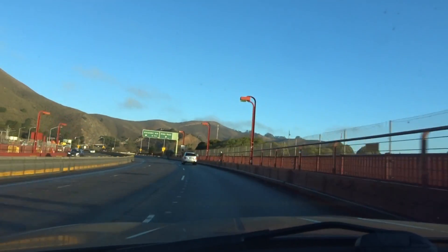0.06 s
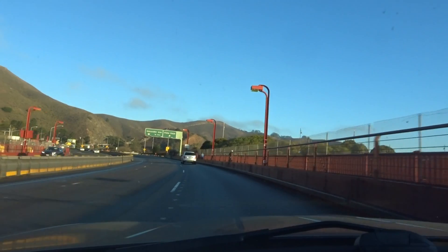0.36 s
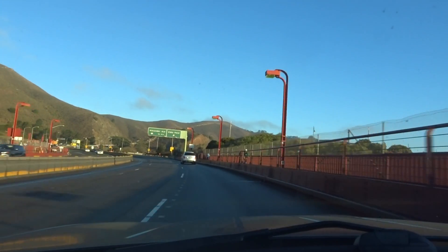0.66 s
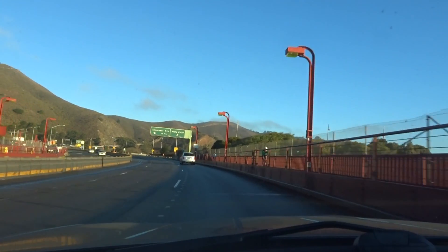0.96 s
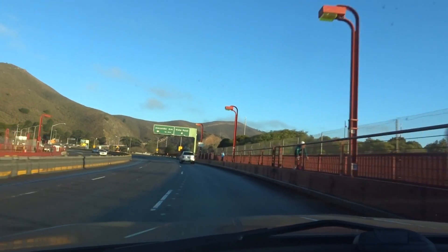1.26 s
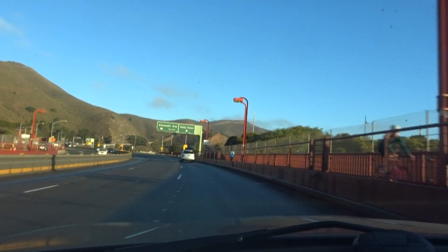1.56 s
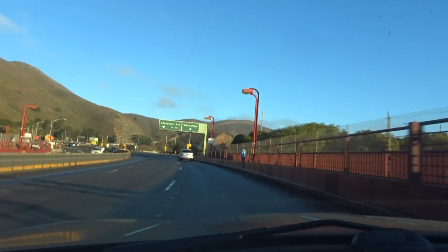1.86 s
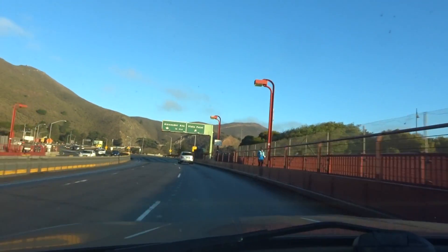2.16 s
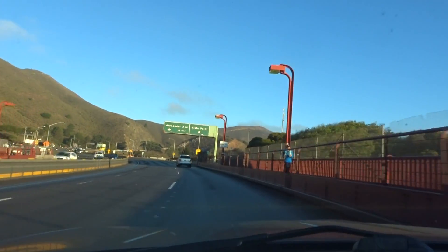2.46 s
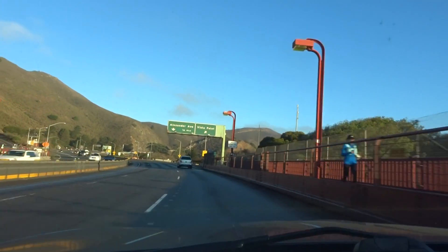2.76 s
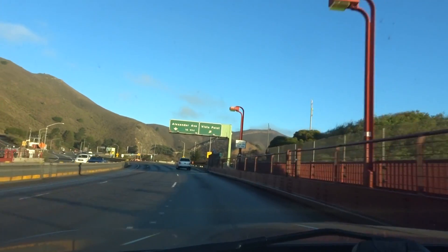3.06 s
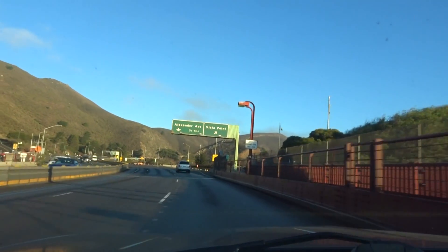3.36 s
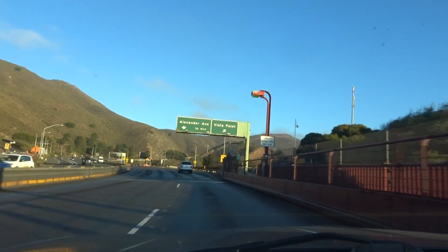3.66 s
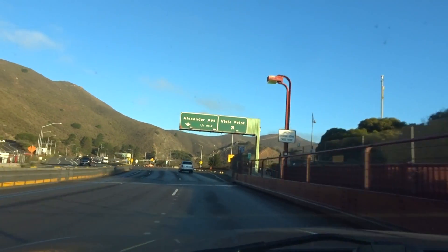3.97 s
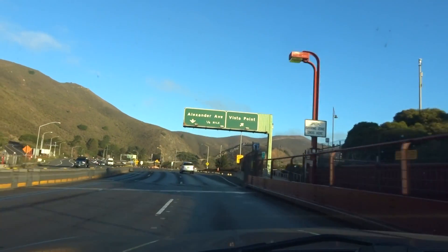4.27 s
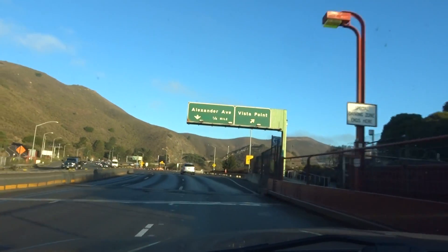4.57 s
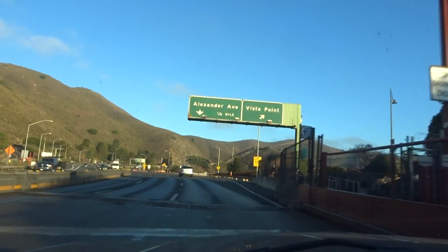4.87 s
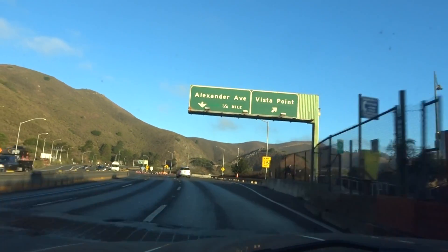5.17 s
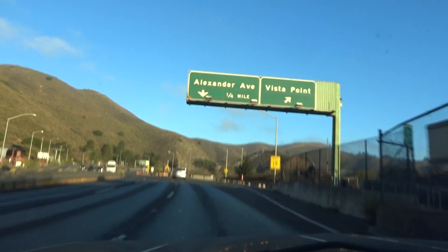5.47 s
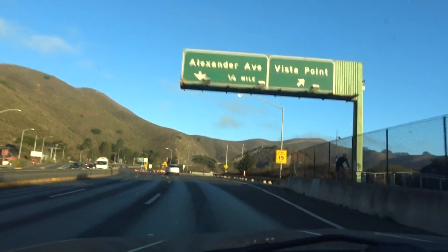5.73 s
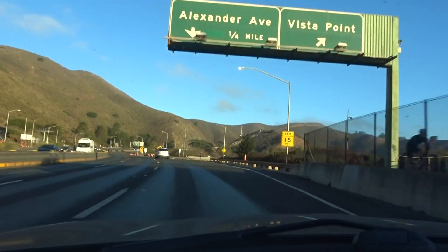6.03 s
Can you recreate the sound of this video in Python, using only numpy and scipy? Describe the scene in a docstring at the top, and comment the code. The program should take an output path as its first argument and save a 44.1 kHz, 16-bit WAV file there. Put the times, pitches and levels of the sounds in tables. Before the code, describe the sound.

Inside a car crossing a bridge at steady speed, the tyres make a constant low rumble and drone. Road joints give paired slaps and dull thumps about once a second, while loose plastic trim ticks faintly on the right. Near the end the trim rattles more, the tyres drum over steel plates with a deep thud, and the road turns quieter. The stereo microphone sits behind the windscreen.

```python
"""Inside a car crossing a bridge at a steady speed, a stereo microphone behind the windscreen.
The rough deck drives the cabin's resonances through the tyres; off to the right, loose trim ticks
and rattles. Each deck joint slaps the front tyres, then the rear ones, and thumps the body.
After a big expansion joint the car rolls onto smoother, quieter asphalt."""
import sys
import numpy as np
from scipy import signal
from scipy.fft import rfft, irfft
from scipy.io import wavfile
from scipy.ndimage import uniform_filter1d, minimum_filter1d

SR = 44100
rng = np.random.default_rng(int(sys.argv[2]) if len(sys.argv) > 2 else 0)


def store_pcm(level_fs):
    """Save levels as 16-bit WAV."""
    pcm = np.round(np.clip(level_fs, -1, 1) * 32767).astype(np.int16)
    wavfile.write(sys.argv[1], SR, np.atleast_2d(pcm).T)


N = 273420
DECK_END_S = 5.79
AXLE_LAG_S = .127  # rear tyres after front tyres

def amp(db):
    """Decibels to gain."""
    return 10 ** (np.asarray(db) / 20)

def unit_rms(x):
    """Scales to an rms of 1."""
    return x / np.sqrt(np.mean(x ** 2) + 1e-20)

def curve(points, hz):
    """A table joined by straight lines over log frequency."""
    points_hz, values = np.transpose(points)
    return np.interp(np.log(hz + 1), np.log(points_hz + 1), values)

def bins():
    """The frequencies of a whole-length spectrum."""
    return np.fft.rfftfreq(N, 1 / SR)

def steadied(x, window_s):
    """Takes the slow chance swells out of a noise and leaves its fast grain."""
    power = uniform_filter1d((x ** 2).mean(0), int(window_s * SR))
    return x / np.sqrt(uniform_filter1d(power, int(window_s * SR / 2)) + 1e-12)

def strike(t, rise_s, decay_s):
    """Envelope of a blow: quick rise, exponential fall."""
    shape = (1 - np.exp(-t / rise_s)) * np.exp(-t / decay_s)
    return shape / shape.max()

def arch(start_s, length_s):
    """An envelope that swells and falls once."""
    return np.sin(np.pi * np.clip((np.arange(N) / SR - start_s) / length_s, 0, 1))

# Resonances around the microphone, of body, cabin air, tyre cavity and tread: pitch_hz, width_hz, lift_db
RESONANCES = [(30.8, 7.6, 12), (127, 10, 6.5), (187.7, 28, 5.5), (222.9, 19.5, 12), (272, 40, 7),
              (370, 31, 5.0), (425.2, 42, 6.5), (637, 5.3, 5), (800.6, 12, 6.5), (1000, 47, 9),
              (1059, 20, 10), (1130, 52, 3.5), (1173, 39, 6), (1330, 28, 3), (1507, 25, 4), (2020, 26, 2),
              (2600, 22, 1.5), (4820, 625, 6), (7000, 410, 3)]
def resonance_db(hz):
    """How far the cabin's resonances raise each frequency."""
    return sum(db / (1 + (2 * (hz - pitch) / width) ** 2) for pitch, width, db in RESONANCES)

# How alike the microphone's two ports hear the cabin off resonance: frequency_hz, coherence
PORT_COHERENCE = [(30, .995), (150, .97), (350, .8), (550, .87), (850, .65), (1500, .48), (1900, .7),
                  (2650, .62), (3100, .15), (7000, .3), (15000, .2)]
# Phase between the ports: frequency_hz, left_lead_rad
PORT_LEAD = [(30, -0.55), (60, 0.8), (110, 0.51), (230, 0.8345), (900, 0.58), (1900, 0), (2350, 2.1),
             (3200, -4.5), (4500, 3.5), (7000, -2.5)]
# Balance between the ports: frequency_hz, left_minus_right_db
PORT_BALANCE = [(80, 0), (280, -0.5), (365, 2), (490, -1.5), (570, -3), (770, 0.5), (950, -1.3), (1100, -1),
                (1700, -3), (2400, -1.5), (6000, -3), (14000, -2)]
def noise_at_mic(spectrum):
    """Noise at both ports; resonances reach them more alike than the diffuse rest."""
    hz = bins()
    left, diffuse = np.exp(2j * np.pi * rng.random((2, len(hz))))
    coherence = np.clip(1 - (1 - curve(PORT_COHERENCE, hz)) / amp(resonance_db(hz)), 0, 1)
    right = coherence * left + np.sqrt(1 - coherence ** 2) * diffuse
    right *= np.exp(-1j * curve(PORT_LEAD, hz))
    lean = amp(curve(PORT_BALANCE, hz) / 2)
    return unit_rms(irfft(np.array([left * lean, right / lean]) * spectrum, N))

def tone_at_mic(hz, t):
    """A sine of random phase as it reaches the two ports."""
    lag_rad = np.array([[0], [curve(PORT_LEAD, hz)]])
    return np.cos(2 * np.pi * (hz * t + rng.random()) - lag_rad)

# Rolling on the bridge, heard from inside: frequency_hz, density_db
DECK_SPECTRUM = [(12, -26), (28, -12.5), (70, -7.5), (150, -9), (260, -14.5), (520, -20.5), (900, -28),
                 (1250, -32), (1700, -40), (2800, -45), (3500, -51), (4100, -60.5), (6000, -72.5),
                 (15500, -84.5)]
# The surface under the tyres; the sound follows part of each column's swing about its mean:
# time_s, long_waves_db, unevenness_db, grain_db
DECK_SURFACE = [(0.0, -21.5, -21.5, -29), (0.48, -22.5, -20, -28.5), (0.8, -21.5, -19, -30.5),
                (1.2, -25, -18.5, -30.5), (1.73, -21.5, -19.5, -30.5), (2.03, -26.5, -22.5, -29),
                (2.32, -26.5, -17, -29), (2.59, -20, -22.5, -31), (2.95, -27, -20, -29),
                (3.37, -17.5, -19.5, -29.5), (3.67, -25, -19.5, -28.5), (4.06, -23.5, -20, -29.5),
                (4.39, -22, -17, -27.5), (4.62, -20.5, -21.5, -31.5), (5.14, -25, -21, -30),
                (5.4, -19, -19.5, -31)]
def deck_roll():
    """The deck shakes the body, drones in the cabin and roars in the treads; air hisses past the glass."""
    t, hz = np.arange(N) / SR, bins()
    colour = amp(curve(DECK_SPECTRUM, hz) + resonance_db(hz)) * hz ** 2 / (hz ** 2 + 8 ** 2)
    low, mid, high = (1 / (1 + (hz / cutoff_hz) ** 10) for cutoff_hz in (160, 560, 1600))
    times, *levels = np.transpose(DECK_SURFACE)
    waves, unevenness, grain = (np.interp(t, times, db - db.mean()) for db in levels)

    def band(power_share, steady_s):
        """One steady part of the rolling noise."""
        return steadied(noise_at_mic(colour * np.sqrt(abs(power_share))), steady_s)

    rumble = amp(-20.5 + .76 * waves) * band(low, .16)
    drone = amp(-18 + .7 * unevenness) * band(mid - low, .14)
    tread = amp(-28 + .64 * grain) * band(high - mid, .28)
    wind = amp(-42.5 + .4 * grain) * band(1 - high, .21)
    return rumble + drone + tread + wind

# The duller roll past the bridge, from the same seat: frequency_hz, density_db
ASPHALT_SPECTRUM = [(15, -12.5), (29, -7), (50, -8.5), (150, -13), (260, -14), (420, -19.5), (620, -23),
                    (950, -25), (1280, -33.5), (1760, -41.5), (2700, -46), (4000, -62), (6000, -75),
                    (15500, -82)]
def road(crossfade_s=.067, asphalt_db=-23.5, resonance_share=.37):
    """The rough deck gives way to asphalt, which barely wakes the resonances."""
    hz = bins()
    colour = amp(curve(ASPHALT_SPECTRUM, hz) + resonance_share * resonance_db(hz))
    asphalt = amp(asphalt_db) * steadied(noise_at_mic(colour), .74)
    on_asphalt = np.clip(.5 + (np.arange(N) / SR - DECK_END_S) / crossfade_s, 0, 1)
    return np.sqrt(1 - on_asphalt) * deck_roll() + np.sqrt(on_asphalt) * asphalt

# Spells of shaking in the trim, right of the microphone: start_s, length_s, level_db
CHATTER_SPELLS = [(4.04, 0.55, -69), (4.091, .035, -51), (4.372, .075, -58), (5.16, 0.42, -65.5),
                  (5.535, 0.25, -50.5), (5.78, 0.11, -72)]
def trim_chatter(contacts_per_s=9000, spread_db=2.5, clump_db=2.5,
                 rise_s=.023, fall_s=.016, settle_s=.07, settle_db=-13.5):
    """Tiny contacts of the shaken trim clump into a rustle; the last loose parts settle slowly."""
    t, shaking = np.arange(N) / SR, np.zeros(N)
    for start_s, length_s, db in CHATTER_SPELLS:
        after_s = np.maximum(t - start_s - length_s, 0)
        release = np.exp(-after_s / fall_s) + amp(settle_db) * np.exp(-after_s / settle_s)
        shaking += amp(db) * np.clip((t - start_s) / rise_s, 0, 1) * release
    contacts = amp(spread_db * np.minimum(rng.exponential(1, (2, N)), 4))
    contacts *= rng.random((2, N)) < contacts_per_s / SR
    contacts *= amp(clump_db * unit_rms(uniform_filter1d(rng.standard_normal(N), size=260)))
    contacts *= rng.standard_normal((2, N))
    colour = amp(curve([(1000, -21), (3200, 7), (8000, -7), (12000, -10.5), (15500, -10)], bins()))
    return shaking * unit_rms(irfft(rfft(contacts) * colour, N))

def faint_knocks(count=8, level_db=-56.5, pitch_hz=4200, length_s=.005):
    """Light knocks at random moments on the deck, each a little different in level and pitch."""
    return [(when * DECK_END_S, level_db + 4 * (force - .5), pitch_hz * 2 ** (pitch - .5), length_s)
            for when, force, pitch in rng.random((count, 3))]

# The ring of the plastic trim: frequency_hz, density_db
TRIM_SPECTRUM = [(600, -8), (2000, 16.5), (3200, 8.5), (4500, 3.5), (6000, -5.5), (7800, -5.5), (9200, -10),
                 (10500, -6.5), (12500, -8.5), (15500, -5)]
# Loose trim knocking, right of the microphone: start_s, level_db, pitch_hz, length_s
TRIM_KNOCKS = [(.63, -54, 6000, .004), (.756, -53, 5500, .005), (1.088, -45, 3440, .005),
               (1.165, -51, 4500, .004), (1.574, -48.5, 3800, 0.021), (1.689, -48, 4500, .005),
               (4.072, -40.5, 5600, .003), (4.084, -40, 6400, 0.0053), (4.302, -49.5, 7000, 0.0035),
               (4.432, -43, 8200, 0.0063), (4.470, -43, 5500, .004), (4.749, -46, 4600, .01),
               (4.805, -45, 4180, 0.011), (4.85, -34.5, 6000, 0.0072), (4.864, -48, 6700, 0.012),
               (5.198, -47.5, 6000, .01), (5.407, -36, 4500, 0.012), (5.468, -39, 2800, 0.0076),
               (5.497, -33, 5000, .002), (5.505, -44, 7500, 0.0017), (5.512, -37, 11000, .003),
               (5.532, -35, 10000, 0.0034), (5.551, -30, 3980, 0.0019), (5.605, -35, 9000, 0.0044),
               (5.636, -38.5, 6000, .008), (5.706, -43, 2600, .009), (5.721, -36, 9000, .0025),
               (5.749, -35.5, 2600, 0.014)]
def trim_ticks(rise_s=.0013, tail_s=.015, tail_db=-16, grit_db=3.5, focus_db=7, uneven_db=2.5):
    """Plastic parts buzz together for milliseconds, each around its own pitch; the cabin adds a tail."""
    size, out = 8192, np.zeros((2, N))
    t, hz = np.arange(size) / SR, np.fft.rfftfreq(size, 1 / SR)
    for start_s, db, pitch_hz, length_s in list(TRIM_KNOCKS) + faint_knocks():
        grit = unit_rms(amp(grit_db * np.repeat(rng.standard_normal(size // 32), 32)))
        fall = np.exp(-.5 * (t / length_s) ** 2) + amp(tail_db) * np.exp(-t / tail_s)
        envelope = (1 - np.exp(-t / rise_s)) * fall
        # every contact point favours other resonances of the panel
        contact_db = uneven_db * unit_rms(uniform_filter1d(rng.standard_normal(len(hz)), size=120))
        off_pitch_db = focus_db * np.log2((hz + 1) / pitch_hz) ** 2
        colour = amp(curve(TRIM_SPECTRUM, hz) + contact_db - off_pitch_db)
        burst = unit_rms(irfft(rfft(rng.standard_normal((2, size))) * colour)) * envelope * grit
        slot = out[:, int(start_s * SR):][:, :size]
        slot += amp(db) * burst[:, :slot.shape[1]]
    return out

def from_right(x):
    """The trim lies to the right, so the left port is shaded, more so in the treble."""
    lean = amp(curve([(2000, -.5), (5000, -2), (9000, -4.4), (14000, -5.4)], bins()) / 2)
    return irfft(rfft(x) * np.array([lean, 1 / lean]), N)

# Each axle on the expansion joint's steel plates, under the floor: start_s, length_s, level_db
PLATE_CROSSINGS = [(5.455, 0.093, -20), (5.58, 0.092, -19.5)]
# The plates' hollow roar: frequency_hz, density_db
PLATE_SPECTRUM = [(100, -18), (290, 0), (420, -1), (600, -3), (850, -16), (1500, -38), (5000, -68)]
# The deep rumble of the body around the microphone: frequency_hz, density_db
HEAVE_SPECTRUM = [(10, -18), (26, -1), (60, -5), (120, -10), (300, -15.5), (700, -47), (3000, -90)]
def expansion_joint(heave_db=-13.5):
    """The tyres drum across steel plates, axle by axle, above one long heave of the body."""
    roar = steadied(noise_at_mic(amp(curve(PLATE_SPECTRUM, bins()))), .055)
    heave = steadied(noise_at_mic(amp(curve(HEAVE_SPECTRUM, bins()))), .055)
    crossings = sum(amp(db) * arch(start_s, length_s) for start_s, length_s, db in PLATE_CROSSINGS)
    return roar * crossings + heave * amp(heave_db) * arch(start_s=5.52, length_s=.32)

# The ring of a struck tyre, heard from inside: pitch_hz, level_db
TYRE_MODES = [(420, -9), (800, -3), (910, -7), (1020, 0), (1130, -12), (1480, -20), (2050, -23),
              (2650, -28)]
# Chips and stray edges catching one tyre: start_s, slap_db, scuff_over_ring_db
ROAD_CHIPS = [(.034, -26.5, -11), (.455, -34, -7), (5.751, -38.5, 14)]
# Deck joints meeting the front tyres; the last four columns drive the body's thumps:
# start_s, slap_db, scuff_over_ring_db, rear_over_front_db, boom_db, boom_hz, boom_swell_s, bounce_db
DECK_JOINTS = [(.768, -32.5, 0.5, 1, -6, 209, 0.035, -13.5),
               (1.553, -23.5, -8, -0.5, -19, 108.5, 0.028, -8.5),
               (2.357, -26.5, 3.5, -3, -5.5, 100, 0.017, -14),
               (3.162, -25, -10.5, 7.5, -8, 127.6, 0.026, -21), (4.416, -31.5, -11, 6, -7, 103, 0.021, -12),
               (5.459, -31.5, 6, -4, -8, 194.3, 0.027, -13), (5.581, -37, 11.5, 5, -17.5, 91.2, 0.073, -13)]
def tyre_slaps(rise_s=.0022, decay_s=.01):
    """A joint strikes the front tyres, then the rear; they ring briefly, and sharp edges add a scuff."""
    t, out = np.arange(N) / SR, np.zeros((2, N))
    scuff_hz_db = [(100, -17), (300, 3), (900, 8), (1600, -7), (2900, -14), (5000, -34.5), (10000, -61.5)]
    scuff = noise_at_mic(amp(curve(scuff_hz_db, bins())))
    front = [(s, db, scuff_db) for s, db, scuff_db, *_ in DECK_JOINTS]
    rear = [(s + AXLE_LAG_S, db + rear_db, scuff_db) for s, db, scuff_db, rear_db, *_ in DECK_JOINTS]
    for start_s, db, scuff_db in front + rear + list(ROAD_CHIPS):
        span = (t >= start_s) & (t < start_s + 10 * decay_s)
        age = t[span] - start_s
        ring = unit_rms(sum(amp(mode_db) * tone_at_mic(hz, age) for hz, mode_db in TYRE_MODES))
        out[:, span] += amp(db) * strike(age, rise_s, decay_s) * (ring + amp(scuff_db) * scuff[:, span])
    return out

# Single jolts of the body around the microphone: crest_s, relative_db, pitch_hz, swell_s
BODY_JOLTS = [(2.86, -14, 112, 0.033), (3.44, -13, 196.4, 0.062), (3.8, -16, 51.7, 0.036),
              (5.29, -8.5, 105, 0.017), (5.567, -6, 61.5, 0.019), (5.614, -7, 417, 0.012),
              (5.7, -9, 111.5, 0.034), (5.81, -7, 59, 0.0058)]
def body_thumps(level_db=-2.5, boom_lag_s=.032, front_bounce_hz=54.6, rear_bounce_hz=41,
                fall_over_rise=1.25, shudder_db=-11, shudder_s=.03):
    """The suspension passes on each bump: the cabin booms, the body bounces and the panels shudder."""
    t, out, swells = np.arange(N) / SR, np.zeros((2, N)), list(BODY_JOLTS)
    panel_hz_db = [(20, -13.5), (90, -2.5), (250, -2.5), (450, -10.5), (900, -35), (3000, -78.5)]
    panels = steadied(noise_at_mic(amp(curve(panel_hz_db, bins()))), .08)
    for front_s, *_, boom_db, boom_hz, boom_swell_s, bounce_db in DECK_JOINTS:
        rear_s = front_s + AXLE_LAG_S
        # boom and bounce for each axle; the rear springs bounce lower and later
        swells += [(front_s + boom_lag_s, boom_db, boom_hz, boom_swell_s),
                   (front_s + .026, bounce_db, front_bounce_hz, .012),
                   (rear_s + boom_lag_s, boom_db - 3, boom_hz, boom_swell_s),
                   (rear_s + .059, bounce_db + 3, rear_bounce_hz, .03)]
        for hit_s in (front_s, rear_s):
            span = (t >= hit_s) & (t < hit_s + 10 * shudder_s)
            envelope = strike(t[span] - hit_s, rise_s=.005, decay_s=shudder_s)
            out[:, span] += amp(boom_db + shudder_db) * envelope * panels[:, span]
    for crest_s, db, pitch_hz, swell_s in swells:
        span = abs(t - crest_s) < 4 * swell_s
        offset_s = t[span] - crest_s
        width_s = np.where(offset_s > 0, fall_over_rise * swell_s, swell_s)
        out[:, span] += amp(db) * np.exp(-(offset_s / width_s) ** 2) * tone_at_mic(pitch_hz, offset_s)
    return amp(level_db) * out

def scene():
    """Everything heard from behind the windscreen."""
    return road() + tyre_slaps() + body_thumps() + from_right(trim_ticks() + trim_chatter()) + expansion_joint()

def gain_control(x, threshold_db=-12.5, squeeze=.76, sense_s=.015, recover_db_per_s=55):
    """Turns everything down under each loud boom and soon recovers."""
    pole = np.exp(-1 / (sense_s * SR))
    power_db = 10 * np.log10(signal.lfilter([1 - pole], [1, -pole], (x ** 2).mean(0)) + 1e-12)
    recovery_db = recover_db_per_s * np.arange(N) / SR
    held_db = np.maximum.accumulate(power_db + recovery_db) - recovery_db
    over_db = np.maximum(held_db - threshold_db, 0)
    return x * amp(-squeeze * uniform_filter1d(over_db, size=200))

def record(dry):
    """After the microphone: gain control, a limiter that eases down around crests, then a band limit."""
    ceiling, hold_samples, cutoff_hz = .72, 900, 15780
    x = gain_control(dry)
    gain = minimum_filter1d(np.minimum(1, ceiling / (abs(x).max(0) + 1e-9)), hold_samples)
    gain = uniform_filter1d(uniform_filter1d(gain, hold_samples // 2), hold_samples // 2)
    lowpass = signal.firwin(1023, cutoff_hz, window=("kaiser", 9), fs=SR)
    return signal.oaconvolve(x * gain, lowpass[None], "same")

dry = scene()
out = record(dry)
store_pcm(out)
```